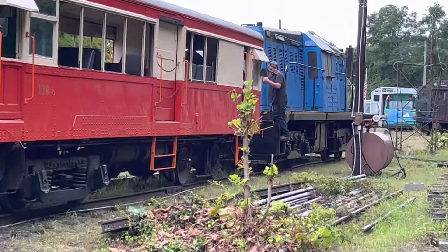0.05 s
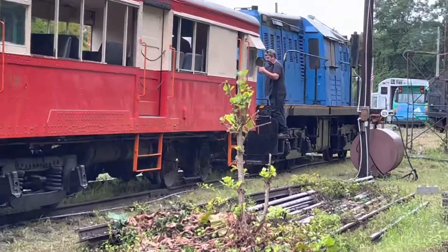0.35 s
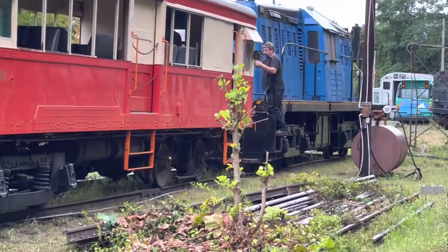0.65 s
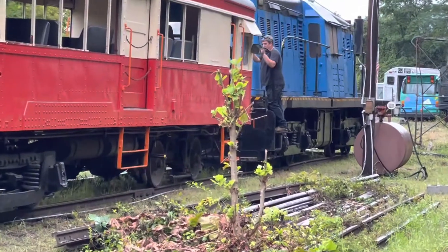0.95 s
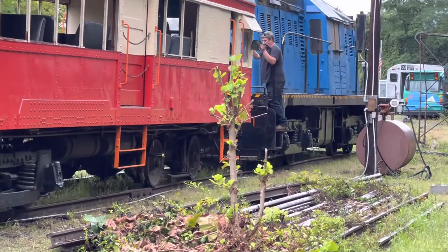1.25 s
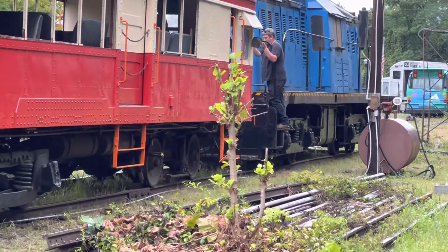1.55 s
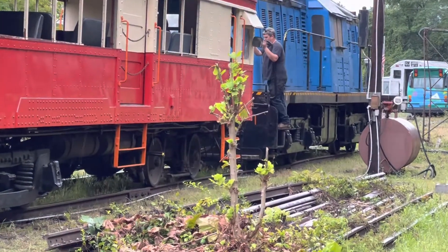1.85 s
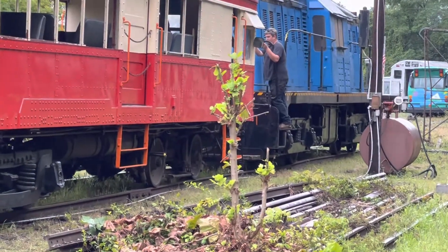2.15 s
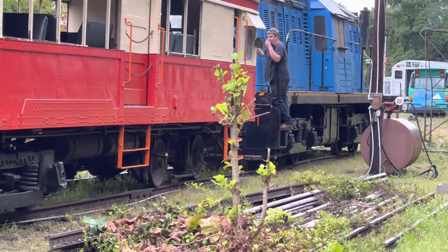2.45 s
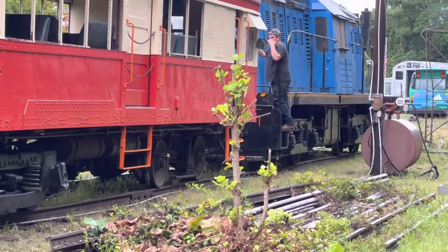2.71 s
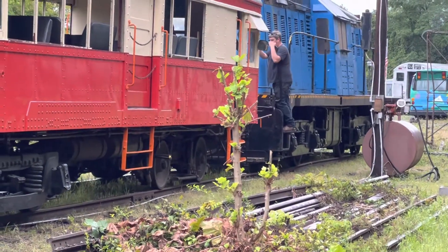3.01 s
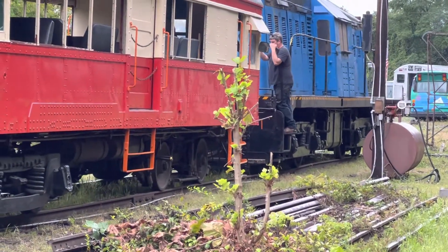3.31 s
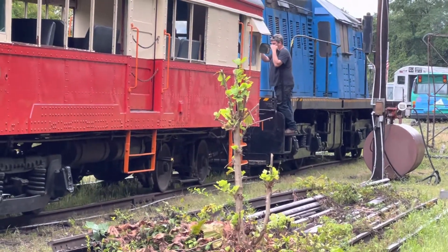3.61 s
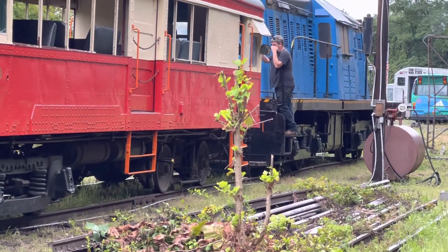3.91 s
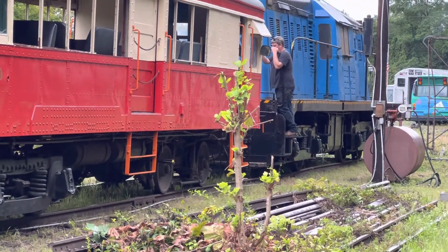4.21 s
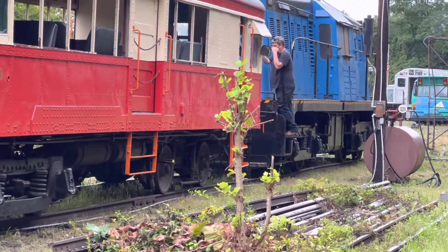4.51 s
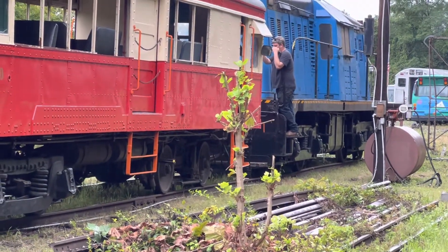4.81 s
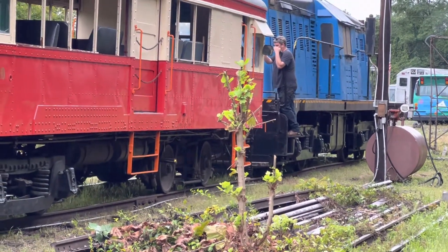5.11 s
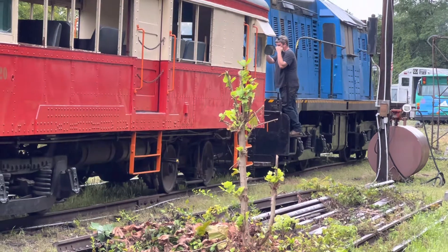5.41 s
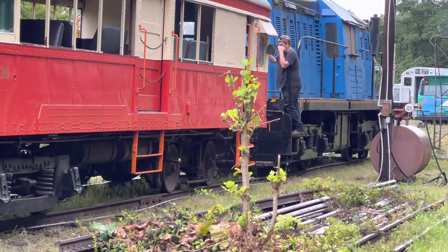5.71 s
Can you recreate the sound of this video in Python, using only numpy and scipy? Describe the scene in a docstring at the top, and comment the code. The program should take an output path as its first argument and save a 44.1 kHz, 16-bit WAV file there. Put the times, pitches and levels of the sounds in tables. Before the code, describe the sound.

A deep diesel train engine surges, sags and picks up again while its wheels grind briefly and the coupling clanks.

```python
"""A rail yard, in stereo, a few metres from the track where a diesel rail car strains to pull a locomotive.
Its firings boom in the exhaust and clatter in the block; the load drags the engine down, then it picks up.
Slipping wheels grind and crush grit, the steel coupling clanks and groans, the car body thuds.
Further off a second engine idles, a thin whine fades away and an insect trills in the grass."""
import sys
import numpy as np
from scipy import signal
from scipy.fft import rfft, irfft
from scipy.io import wavfile

SR = 44100
rng = np.random.default_rng(int(sys.argv[2]) if len(sys.argv) > 2 else 0)


def pcm_store(signal):
    """Save signal as 16-bit PCM."""
    levels = np.round(np.clip(np.atleast_2d(signal), -1, 1) * 32767)
    wavfile.write(sys.argv[1], SR, levels.astype(np.int16).T)


N = 254016
TIME = np.arange(N) / SR

# six-cylinder engine, dragged down and recovering: t/s, firing rate/Hz
ENGINE_SPEED = [(0.0, 57.2), (0.2, 52.6), (0.7, 56.9), (1.06, 58.3), (1.38, 51.4), (1.95, 42.9),
                (2.8, 38.4), (3.3, 44.7), (4.4, 54.4), (5.1, 56.9), (5.76, 59.6)]
def diesel(knock=0.051):
    """The rail car's engine, close by: speed and throttle drive its boom, rumble and clatter."""
    firing_hz = np.interp(TIME, *np.transpose(ENGINE_SPEED))
    firings = np.cumsum(firing_hz) / SR
    power = throttle()
    throb = rms_one(1 + knock * np.cos(2 * np.pi * firings))
    boom = pipe_boom(firing_hz, firings, power)
    rumble = exhaust_rumble(firing_hz, firings, power, throb)
    return boom + rumble + block_clatter(firing_hz, power, throb)

# surges of power: throttle opens t/s, closes t/s
THROTTLE_SURGES = [(-1.04, -0.13), (0.19, 0.93)]
def throttle(quick_share=0.36, quick_s=0.039, slow_s=0.98, fall_s=0.34):
    """Power, 0 to 1: a quick step and a slow climb while open, a steady fall once closed."""
    power = 0
    for opens, closes in THROTTLE_SURGES:
        open_s = np.clip(TIME - opens, 0, closes - opens)
        step = quick_share * (1 - np.exp(-open_s / quick_s))
        climb = (1 - quick_share) * np.minimum(open_s / slow_s, 1)
        power = power + (step + climb) * np.clip(1 - (TIME - closes) / fall_s, 0, 1)
    return power

# engine tones: multiple of the six-firing cycle, level/dB before the pipe, full-throttle boost/dB
ENGINE_ORDERS = [(6, 2.5, 22), (9, -13.5, 7), (11, -14.5, 5), (12, 1.6, 15.5), (15, -11, -21),
                 (18, -13.5, 23), (27, -5.5, -4), (30, -7.5, 10.5), (35, -10, 4.5)]
# response of the exhaust pipe: f/Hz, gain/dB
PIPE_RESPONSE = [(38, -40), (43, -44.5), (48, -34), (53, -34), (56, -35.5), (58.5, -35), (77, -31),
                 (89, -29), (96, -22.5), (103, -34.5), (109, -38), (116, -53), (132, -41.5), (147, -29),
                 (170, -46)]
def pipe_boom(firing_hz, firings, power, waver_db=0.7):
    """Tones of the firings and the unequal cylinders boom as they sweep through the pipe's resonances."""
    boom = 0
    for multiple, db, surge_db in ENGINE_ORDERS:
        per_firing = multiple / 6
        pipe_db = np.interp(per_firing * firing_hz, *np.transpose(PIPE_RESPONSE))
        level = from_db(db + pipe_db + waver_db * drift(1.45))
        push = 1 + power * (from_db(surge_db) - 1)
        boom = boom + level * push * np.sin(2 * np.pi * per_firing * firings)
    return np.sqrt(2) * boom

# exhaust spectrum: f/Hz, level/dB
EXHAUST_SPECTRUM = [(20, -39), (32, -32), (45, 3), (60, -0.5), (100, 2), (130, 0.5), (180, -5.5),
                    (250, -9.5), (320, -11.5), (400, -26), (600, -41.5), (1200, -96.5)]
def exhaust_rumble(firing_hz, firings, power, throb, uneven=0.28, misfire=0.38, surge_db=5):
    """Each firing sends a pulse down the exhaust, over a throbbing roar."""
    count = np.floor(firings).astype(int)
    # every other cylinder fires harder, and no two firings are quite alike
    strength = 1 + uneven * (-1) ** count + misfire * rng.standard_normal(1000)[count]
    pulses = shaped(np.diff(count, prepend=0) * strength, EXHAUST_SPECTRUM)
    pulses = rms_one(filtered(pulses, 4, 135, "high"))
    roar = throb * wash(EXHAUST_SPECTRUM, white())
    drum_db = 3.5 * np.maximum(firing_hz - 58.4, 0)  # near top speed the whole car drums
    level = from_db(-39 + drum_db + 0.09 * (firing_hz - 50) + surge_db * power)
    return level * (from_db(-9.5) * pulses + from_db(3) * roar)

# engine block spectrum: f/Hz, level/dB
BLOCK_SPECTRUM = [(200, -18.5), (360, 3), (480, 2), (690, 3.5), (785, 3.5), (860, 3), (1100, 0), (1400, -6),
                  (1650, -7.5), (2000, -10), (2600, -14), (3400, -18.5), (3900, -22), (8000, -54)]
def block_clatter(firing_hz, power, throb, db_per_hz=0.2135, surge_db=2):
    """Dense contacts rattle through the block, louder with speed and throttle."""
    level = from_db(-48.5 + db_per_hz * (firing_hz - 50) + surge_db * power)
    return level * throb * wash(BLOCK_SPECTRUM, grains(7000, 0.74))

# grinding steel spectrum: f/Hz, level/dB
GRIND_SPECTRUM = [(250, 11.5), (400, 12), (1000, 3.5), (2000, 6.5), (2700, 0), (3500, 2), (4400, -2),
                  (6200, 1), (8000, -5.5), (10000, -11), (11700, -8), (13000, -17.5), (16000, -14)]
# broad rasping resonances of the wheel: f/Hz, width/Hz, relative level/dB
WHEEL_BANDS = [(1100, 380, -8), (2090, 720, -11), (2975, 220, -13), (3630, 480, -12), (4720, 260, -17.5),
               (5520, 260, -22.5)]
def wheels():
    """Slipping steel grinds in dense grains, sets the wheel rasping and crushes grit."""
    slip = wheel_slip(rise_s=0.16, fall_s=0.32)
    sing = wheel_slip(rise_s=0.085, fall_s=0.16)
    rasp = sum(from_db(db) * rms_one(ring(grains(4000, 5.1), hz, band_t60(width)))
               for hz, width, db in WHEEL_BANDS)
    flicker = from_db(0.6 * drift(35))
    grind = 0.8 * slip * wash(GRIND_SPECTRUM, grains(14000, 3.1))
    return flicker * (grind + sing * rasp) + grit(slip)

def wheel_slip(rise_s, fall_s):
    """Gain of the grinding: each surge spins the wheels, which take a while to grip again."""
    slip = 0
    for opens, closes in THROTTLE_SURGES:
        spin_up = 1 - np.exp(-np.maximum(TIME - opens, 0) / rise_s)
        slip = slip + spin_up * np.exp(-np.maximum(TIME - closes, 0) / fall_s)
    return from_db(-40.5) * slip

# grit crushed under a wheel: t/s, level/dB, rise/s, fall/s
GRIT_SCRAPES = [(4.07, -55, .015, 0.025), (4.21, -37, 0.017, 0.017), (4.287, -34, 0.035, 0.038),
                (4.385, -52, .03, 0.13)]
# dry crackles: t/s, relative level/dB, half-length/s
GRIT_CRACKLES = [(0.733, -44.5, 0.008), (0.764, -45, 0.026), (1.061, -49, 0.008), (1.317, -54.5, 0.036),
                 (1.548, -55.5, 0.065), (1.813, -64.5, 0.12), (2.92, -60, .044), (4.28, -54, .014)]
# their two spectra: f/Hz, level/dB
SCRAPE_SPECTRUM = [(200, 15.5), (400, 11.5), (750, 6), (1300, 8.5), (2500, 2), (4200, 2.5), (6500, -3.5),
                   (9000, -10), (12000, -21), (16000, -21)]
CRACKLE_SPECTRUM = [(1500, -15), (3500, 6.5), (6000, 0), (9000, -4.5), (12000, 2), (16000, -22)]
def grit(slip):
    """Grit scrapes and crackles on the rail; under pressure, hard grains burst in bright snaps."""
    crush = sum(from_db(db) * np.exp(-np.maximum((s - TIME) / rise, (TIME - s) / fall))
                for s, db, rise, fall in GRIT_SCRAPES)
    crackle = sum(from_db(db) * swell(s, length) for s, db, length in GRIT_CRACKLES)
    scrapes = crush * wash(SCRAPE_SPECTRUM, grains(6300, 1.2))
    crackles = from_db(-3) * crackle * wash(CRACKLE_SPECTRUM, grains(3000, 0.75))
    pressure = from_db(-5) * crackle + from_db(-22) * (slip + crush)
    return scrapes + crackles + pressure * wash(CRACKLE_SPECTRUM, grains(200, 4.5))

# stones bursting on the rail: t/s, relative level/dB, f/Hz
STONE_BURSTS = [(.114, -47, 6000), (.222, -50, 6000), (.236, -51, 3500), (.33, -47, 3600),
                (.405, -42, 3700), (.42, -44, 3400), (.485, -47, 5000), (.556, -45, 3300),
                (.586, -43, 5500), (.632, -43, 3500), (.691, -45, 6000), (.731, -43, 7000),
                (.76, -42, 3600), (.831, -44, 4300), (.905, -42, 4500), (.988, -44, 3200),
                (1.021, -46, 6300), (1.064, -43, 5800), (1.081, -48, 3500), (1.129, -49, 5600),
                (1.32, -54, 4800)]
def stones(gain_db=2, burst_s=0.0028, width_hz=1700):
    """Single stones crumble under the wheel, each a gritty tick with a pitch of its own."""
    ticks, splinters = 0, white()
    for s, db, hz in STONE_BURSTS:
        tick = ring(splinters * swell(s, burst_s), hz, band_t60(width_hz))
        burst_rms = np.sqrt(np.sum(tick ** 2) / (burst_s * SR))
        ticks = ticks + from_db(db + gain_db) * tick / burst_rms
    return ticks

# slack taken up: t/s, level/dB, rise/s, rattle decay/s, blow gain/dB, blow centre f/Hz, dull above f/Hz
COUPLING_CLANKS = [(2.204, -37.5, .0015, .01, -8, 850, 1400),
                   (2.233, -40.5, 0.0022, 0.017, -15, 1700, 7000),
                   (2.779, -32, 0.0018, 0.013, -5.5, 2570, 9000),
                   (2.79, -35.5, .0012, 0.037, 5, 1160, 12000), (2.8211, -49.5, .003, .022, 10, 720, 3000),
                   (2.839, -49, .0031, 0.023, 6.5, 1940, 5000), (2.853, -48, .002, .02, -4, 2500, 8000),
                   (2.877, -48, .0023, 0.06, 1, 2200, 3000), (2.96, -49, .002, .03, 3, 800, 2500),
                   (3.434, -36.5, .006, 0.019, -9, 900, 9000), (3.457, -40, .004, 0.024, -5, 1000, 3000),
                   (3.582, -39, .0035, 0.012, -13.5, 2200, 8000), (4.197, -44, .005, .008, -10, 1400, 5000),
                   (4.214, -31, .0013, .011, -7.5, 1200, 1000), (4.249, -41, .001, .007, -14, 800, 1200),
                   (4.284, -36, .003, .012, -6, 1300, 4000), (4.307, -43, .001, .008, -9, 800, 1500),
                   (5.674, -39, .001, 0.0055, -14, 1500, 2500),
                   (5.685, -31.5, .018, 0.036, -14, 1000, 2200), (5.75, -40, .002, 0.0087, -14, 3000, 9000)]
# modes of the coupling: f/Hz, relative level/dB, t60/s
COUPLING_MODES = [(768, 5, .1), (803, 8, .16), (1140, -1, .1), (1350, 3, .1), (1440, -4, .09),
                  (1790, 2, .08), (1890, 3, .12), (2000, 0, .12), (2150, -1, .09), (2340, -2, .12),
                  (2620, -4, .12), (2930, -2, .1), (3255, 2, .09), (3590, -2, .1)]
# rattling steel spectrum: f/Hz, level/dB
STEEL_SPECTRUM = [(200, -15), (450, 5), (650, 8.5), (900, 9), (1400, 7), (2100, 0.5), (3300, -1.5),
                  (5000, -5), (7500, -13), (11000, -20), (16000, -25)]
def coupling(ring_db=-3, spread_octaves=0.54):
    """Each clank is a short rattle of contacts and a blow that rings the modes near its centre."""
    contacts = wash(STEEL_SPECTRUM, grains(7000, 3.2))
    rattle = modes = 0
    for s, db, rise, decay, _, _, dull_hz in COUPLING_CLANKS:
        age = np.maximum(TIME - s, 0)
        envelope = from_db(db) * (1 - np.exp(-age / rise)) * np.exp(-age / decay)
        rattle = rattle + envelope * filtered(contacts, 1, dull_hz)
    for k, (hz, mode_db, t60) in enumerate(COUPLING_MODES):
        force = np.zeros(N)
        for s, db, _, _, blow_db, centre_hz, _ in COUPLING_CLANKS:
            detuning = np.log2(hz / centre_hz) / spread_octaves
            force[round(s * SR)] += from_db(db + blow_db) / (1 + detuning ** 2)
        modes = modes + (-1) ** k * from_db(mode_db + ring_db) * ring(force, hz, t60)
    return rattle + modes

def yard_echo(direct, slap_s=0.06, slap_db=-16, tail_db=-9, t60=1.0):
    """After the direct sound come a dull slap off the nearest wall and echoes between the vehicles."""
    dull = filtered(direct[0], 2, 3200)
    slap = from_db(slap_db) * np.interp(TIME - slap_s, TIME, dull, left=0)
    envelope = np.exp(-np.log(1000) * TIME / t60) * np.minimum(TIME / slap_s, 1)
    tails = rng.standard_normal((2, N)) * envelope
    echoes = [signal.fftconvolve(dull, tail / np.linalg.norm(tail))[:N] for tail in tails]
    return direct + slap + from_db(tail_db) * wide(*echoes)

# partials of the groan: f/Hz, level/dB
GROAN_PARTIALS = [(186, -29), (231, -36.5), (139, -43)]
def drawgear_groan(wobble=0.015):
    """The drawgear gives one wavering groan under the strain."""
    groan = sum(from_db(db) * sine(hz * (1 + wobble * drift(29))) for hz, db in GROAN_PARTIALS)
    return groan * swell(at_s=2.38, half_s=0.09)

# bumps of the car body: t/s, level/dB, f/Hz, half-length/s
BODY_BUMPS = [(1.165, -41.5, 328, 0.029), (1.208, -35.5, 253, 0.025), (2.732, -26.5, 60, .035),
              (2.797, -33, 190, .014), (3.024, -24, 59, 0.038), (3.316, -31, 61, 0.031),
              (3.561, -27, 60, 0.026), (3.45, -40.5, 250, 0.027), (4.221, -35, 377, 0.0039),
              (4.238, -36.5, 265, 0.01), (4.294, -31.5, 227, 0.014), (5.035, -20, 61, 0.024),
              (5.713, -38.5, 309, 0.046)]
def car_body():
    """The body heaves in soft bumps and thuds, each a few cycles of a low tone."""
    return sum(from_db(db) * swell(s, length) * np.sin(2 * np.pi * hz * (TIME - s))
               for s, db, hz, length in BODY_BUMPS)

# whine of the idling engine: multiple of its firing rate, relative level/dB
IDLE_PARTIALS = [(5, -54.5), (7, -54), (8, -53), (12.7, -61), (17, -53), (20, -54.5), (21, -60),
                 (23, -54.5), (25, -62), (27, -56), (29, -63), (30, -66), (32, -67), (56.2, -74),
                 (75.6, -74), (91.7, -73), (93.3, -72)]
def idling_engine(firing_hz=45.75, hunting=0.0023, flutter_db=1.5, fading_db=2.0, tick_db=-55):
    """A second engine further off: its whine flutters and slowly grows, valves tick thrice a firing."""
    phase = 2 * np.pi * np.cumsum(firing_hz * (1 + hunting * drift(9.92))) / SR
    direct, scattered = np.zeros((2, N))
    for path in direct, scattered:
        for multiple, db in IDLE_PARTIALS:
            level = from_db(db + flutter_db * drift(40) + fading_db * drift(0.44))
            path += level * np.sin(multiple * phase + 0.21 * drift(5.3) + rng.uniform(0, 2 * np.pi))
    whine = from_db(-3.5 + 2.5 * TIME / TIME[-1]) * wide(direct, scattered)
    ticks = rms_one(np.exp(0.65 * (np.cos(3 * phase) + 0.7 * np.cos(phase))))
    return whine + from_db(tick_db) * ticks * wash(BLOCK_SPECTRUM, white())

# a higher machine whine: f/Hz, level/dB
WHINE_TONES = [(1485, -59.5), (1938, -73), (2950, -82), (3461, -82), (3650, -77.5)]
def machine_whine(end_s=3.1, fade_s=0.82, flutter_db=3.0, wobble=0.0024):
    """Thin wavering tones that fade away about halfway through."""
    pitch = 1 + wobble * drift(12)
    tones = sum(from_db(db + flutter_db * drift(12)) * sine(hz * pitch) for hz, db in WHINE_TONES)
    return np.clip((end_s - TIME) / fade_s, 0, 1) * tones

# the two wing strokes: f/Hz, level/dB, place in the cycle (0-1)
INSECT_STROKES = [(7240, -71.5, 0.05), (6570, -71, .5)]
def insect(wing_hz=16.24, rise_hz=110, blur_hz=90, sharpness=1.8, unsteady_db=2):
    """Wings rub to and fro in the grass, each stroke a thin raspy chirp that rises a little."""
    cycle = 2 * np.pi * wing_hz * TIME + 0.3 * drift(3)
    trill = 0
    for pitch_hz, db, place in INSECT_STROKES:
        stroke = cycle + 2 * np.pi * place
        hz = pitch_hz + rise_hz * np.sin(stroke) + blur_hz * drift(200)
        strength = np.exp(sharpness * np.cos(stroke)) * from_db(unsteady_db * drift(60))
        trill = trill + from_db(db) * rms_one(strength * sine(hz))
    return trill

# background spectrum: f/Hz, level/dB
YARD_SPECTRUM = [(1000, 11.5), (3300, 6), (3900, 0.5), (4400, 3.5), (5800, 6), (6600, 5.5), (7200, 2.5),
                 (7900, -2.5), (8700, -0.5), (10000, -16), (12000, -12.5), (16000, -22)]
def yard_hiss():
    """The soft, steady hiss of the open yard."""
    return from_db(-54) * wash(YARD_SPECTRUM, white())

# sound arriving from the sides: f/Hz, side minus mid level/dB
STEREO_WIDTH = [(30, -31.5), (60, -32.5), (150, -21), (300, -20), (600, -11), (1200, -8.5), (2400, -12.5),
                (4500, -24), (8000, -86), (9500, -62), (16000, -20)]
def wide(direct, scattered):
    """Direct sound is alike at both microphones; sound scattered round the yard differs."""
    return direct + shaped(scattered, STEREO_WIDTH) * np.array([[1], [-1]])

def wash(spectrum, force):
    """A random force sounding through a body, in stereo."""
    return wide(rms_one(shaped(force, spectrum)), rms_one(shaped(white(), spectrum)))

def grains(per_s, spread_db):
    """Random tiny contacts of uneven size, rms 1."""
    sizes = from_db(spread_db * np.minimum(rng.exponential(1, N), 5))
    return rms_one(sizes * rng.choice([-1, 1], N) * (rng.random(N) < per_s / SR))

def ring(force, hz, t60):
    """One decaying mode."""
    r, w = np.exp(-np.log(1000) / (t60 * SR)), 2 * np.pi * hz / SR
    return signal.lfilter([0, np.sin(w)], [1, -2 * r * np.cos(w), r * r], force + 1e-18)

def band_t60(width_hz):
    """Seconds for a resonance of this width to fall 60 dB."""
    return np.log(1000) / (np.pi * width_hz)

def drift(rate_hz):
    """Smooth random wander, rms about 1."""
    r = np.exp(-80 * np.pi * rate_hz / SR)  # one step per 40 samples
    slow = signal.lfilter([1], [1, -2 * r, r * r], rng.standard_normal(N // 40 + 2002))[2000:]
    return np.interp(np.arange(N) / 40, np.arange(len(slow)), rms_one(slow))

def shaped(x, spectrum):
    """Colour a signal by a table of f/Hz, level/dB."""
    hz, db = np.transpose(spectrum)
    bins = np.maximum(np.fft.rfftfreq(N, 1 / SR), 1)
    return irfft(rfft(x) * from_db(np.interp(np.log(bins), np.log(hz), db)), N)

def filtered(x, order, hz, kind="low"):
    """Low-pass or high-pass."""
    return signal.sosfilt(signal.butter(order, hz, kind, fs=SR, output="sos"), x)

def swell(at_s, half_s):
    """Bell-shaped envelope."""
    return np.exp(-((TIME - at_s) / half_s) ** 2)

def sine(hz):
    """A tone following a pitch curve."""
    return np.sin(2 * np.pi * np.cumsum(hz) / SR)

def white():
    """Plain noise."""
    return rng.standard_normal(N)

def from_db(db):
    """Decibels to gain."""
    return 10 ** (np.asarray(db) / 20)

def rms_one(x):
    """Scale to unit rms."""
    return x / np.sqrt(np.mean(x ** 2) + 1e-20)

def scene():
    """The train a few metres away, the yard behind it."""
    train = diesel() + wheels() + stones() + yard_echo(coupling()) + drawgear_groan() + car_body()
    return train + idling_engine() + machine_whine() + insect() + yard_hiss()

# phase lag of the left microphone port: f/Hz, lag/rad
LEFT_PORT_LAG = [(8700, 0), (10100, 3.14), (12050, 6.28), (13850, 9.42), (15500, 12.57)]
def record(dry, low_cut_hz=30, high_cut_hz=15800):
    """The microphone ports fall out of step in the top octave; the deepest bass and the top are cut."""
    lag = np.interp(np.fft.rfftfreq(N, 1 / SR), *np.transpose(LEFT_PORT_LAG))
    left = irfft(rfft(dry[0]) * np.exp(-1j * lag), N)
    ports = filtered(np.array([left, dry[1]]), 3, low_cut_hz, "high")
    return signal.sosfilt(signal.ellip(10, 0.1, 80, high_cut_hz, fs=SR, output="sos"), ports)

dry = scene()
out = record(dry)
pcm_store(out)
```